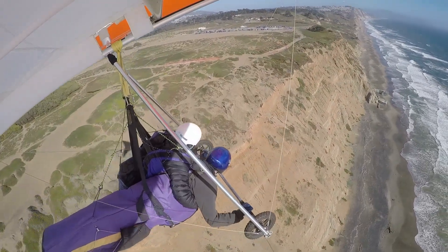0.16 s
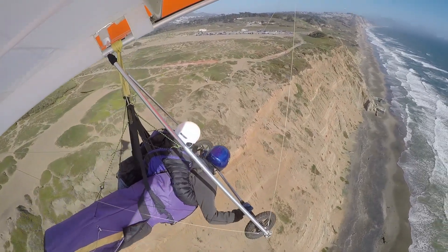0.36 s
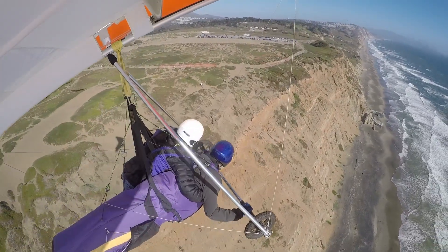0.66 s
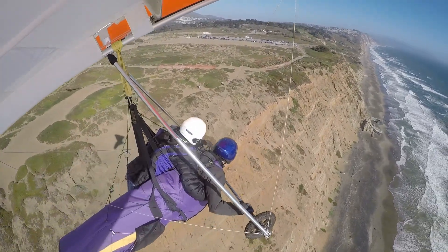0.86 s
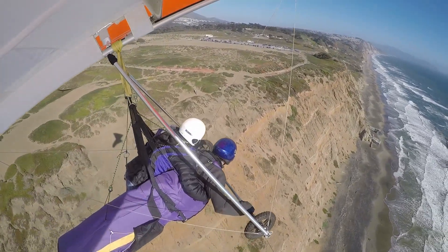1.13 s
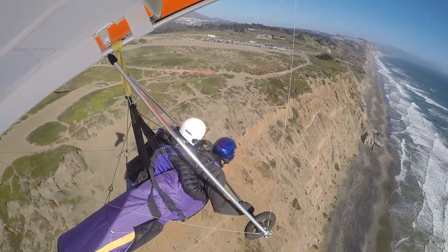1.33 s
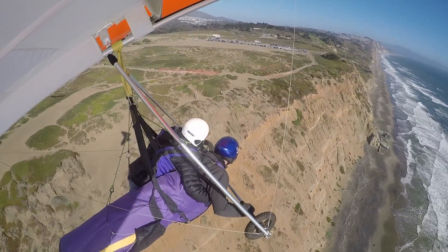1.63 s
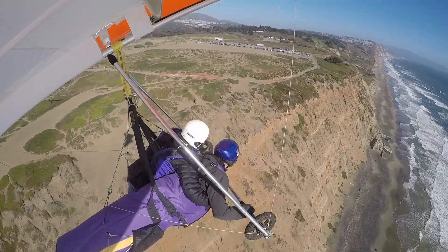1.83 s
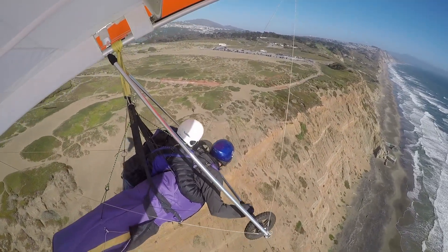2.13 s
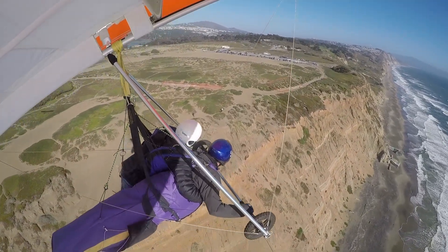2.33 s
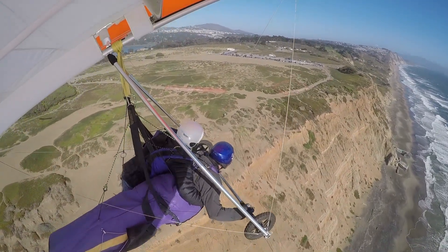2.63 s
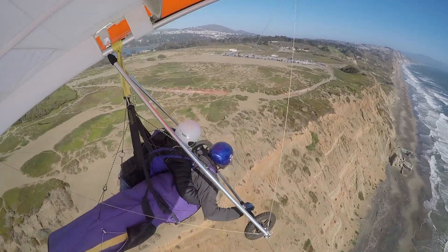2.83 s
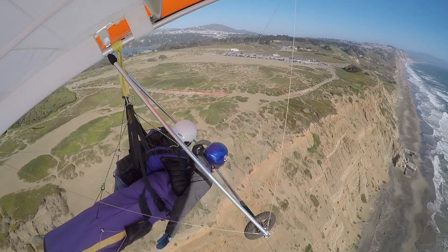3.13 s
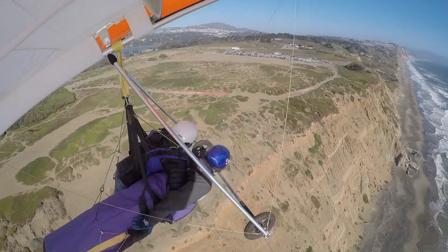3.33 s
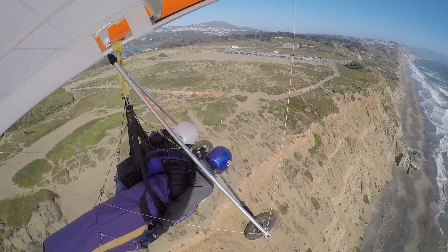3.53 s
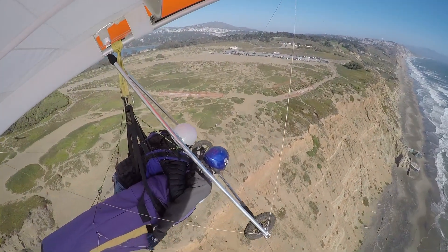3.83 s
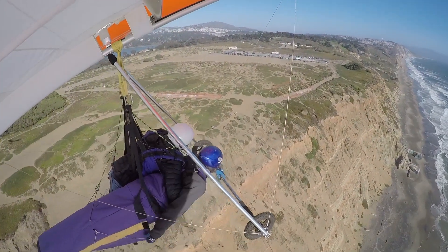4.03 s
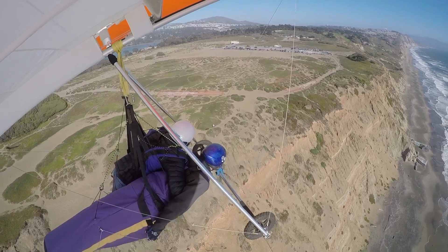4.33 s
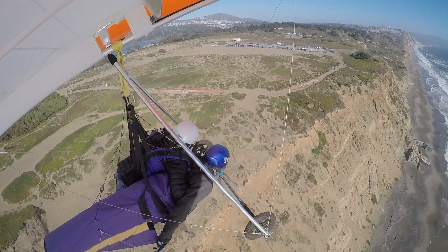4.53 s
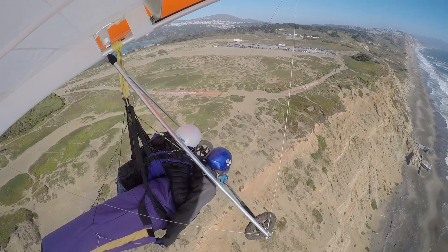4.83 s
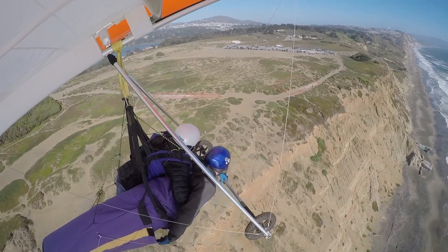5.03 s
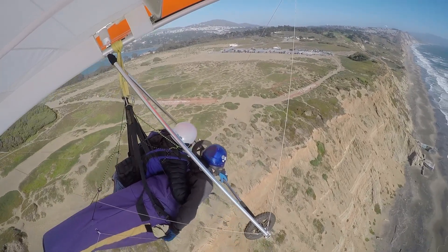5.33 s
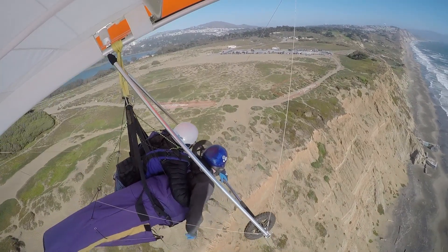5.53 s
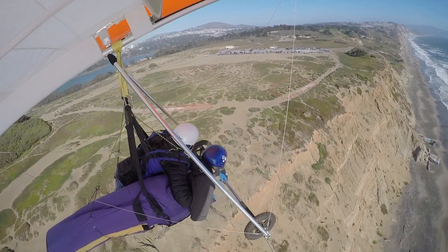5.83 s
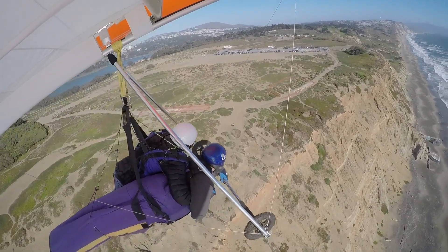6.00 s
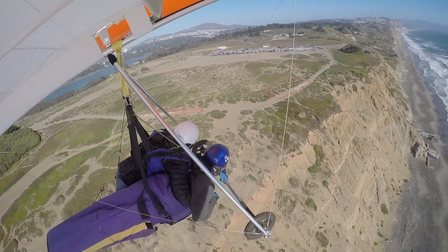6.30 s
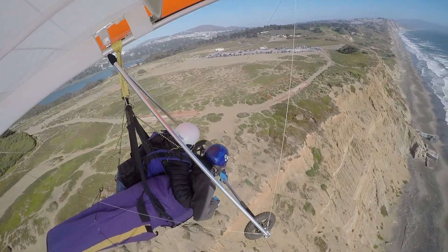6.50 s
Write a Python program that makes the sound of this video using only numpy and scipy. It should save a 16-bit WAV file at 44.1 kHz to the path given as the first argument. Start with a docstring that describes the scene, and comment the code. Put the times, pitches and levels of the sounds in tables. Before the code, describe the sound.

Heavy low wind buffeting shakes a camera on a glider wing, with airy hiss, loose fittings snapping and rattling, and a faint early whistle.

```python
"""Glider wing in flight

Turbulence shakes a camera mount at two low modes, drifting sine tones over broad low noise.
Loose fittings snap, rattle, tick and jolt: decaying modes, with noise bursts on snaps and rattles.
Air hisses over the housing's ports (shaped noise), tubes hum (narrow noise and drifting tones),
and a wire whistles early on (a fluttering tone). A faint microphone hiss lies beneath."""
import sys
import numpy as np
from scipy import signal
from scipy.fft import rfft, irfft, next_fast_len
from scipy.io import wavfile
from scipy.ndimage import uniform_filter1d, map_coordinates

SR = 44100
rng = np.random.default_rng(int(sys.argv[2]) if len(sys.argv) > 2 else 0)


def generate_wav(signal):
    """Clip the signal to [-1, 1] and save it as 16-bit WAV at the path in sys.argv[1]."""
    frames = np.transpose(np.atleast_2d(signal))
    scaled = np.clip(frames, -1, 1) * 32767
    pcm = np.round(scaled).astype(np.int16)
    wavfile.write(sys.argv[1], SR, pcm)


N = 293706


def amp(db):
    """Gain of a level in dB."""
    return 10 ** (np.asarray(db) / 20)


def unit(x):
    """x at rms 1."""
    return x / np.sqrt(np.mean(x ** 2) + 1e-20)


def along(points, hz):
    """Interpolate (frequency, value) points on a log frequency axis."""
    point_hz, values = np.transpose(points)
    return np.interp(np.log(hz + 1), np.log(point_hz + 1), values)


def curves(rows):
    """One value per sample for each column after the time."""
    times_s, *columns = np.transpose(rows)
    t = np.arange(N) / SR
    return [np.interp(t, times_s, column) for column in columns]


def wobble(rate_hz):
    """Smooth random curve, rate_hz knots a second."""
    knots = rng.standard_normal(int(N * rate_hz / SR) + 4)
    return map_coordinates(knots, [np.arange(N) * rate_hz / SR])


def filtered(x, response):
    """x with its spectrum multiplied by a response of frequency."""
    size = next_fast_len(N + SR // 2)
    spectrum = rfft(x, size) * response(np.fft.rfftfreq(size, 1 / SR))
    return irfft(spectrum, size)[..., :N]


def bell(hz, centre_hz, width_hz):
    """Resonance peak of height 1, one half at the edges of its width."""
    return 1 / (1 + (2 * (hz - centre_hz) / width_hz) ** 2)


def resonance(centre_hz, width_hz):
    """Noise ringing in one resonance, rms 1."""
    return unit(filtered(rng.standard_normal(N), lambda hz: bell(hz, centre_hz, width_hz)))


def swinging(hz, drift_hz, rate_hz, rough_db):
    """A sustained mode, rms 1: a sine whose pitch drifts and size wavers at random."""
    size = amp(rough_db * wobble(rate_hz))
    cycles = np.cumsum(hz + drift_hz * wobble(rate_hz)) / SR
    return unit(size * np.sin(2 * np.pi * cycles))


def struck(times_s, modes, levels_db, attack_s, spread_db=0.6):
    """Each blow rings decaying modes at its level, each mode slightly off in strength and pitch."""
    out, t = np.zeros(N + SR), np.arange(SR // 8) / SR
    hz, db, t60_s = np.transpose(modes)[..., None]
    chance = rng.standard_normal((len(times_s), 2, len(modes), 1))
    for s, level_db, (strength, pitch) in zip(times_s, levels_db, chance):
        start_db = db + np.reshape(level_db, (-1, 1)) + spread_db * strength
        decay = amp(start_db - 60 * t / t60_s)
        ring = decay * np.sin(2 * np.pi * hz * (1 + 0.01 * pitch) * t)
        out[round(s * SR):][:len(t)] += ring.sum(axis=0) * (1 - np.exp(-t / attack_s))
    return out[:N]


# airflow: (time [s], hiss level [dB], buffet level [dB])
AIRFLOW = [(0.0, -36, -17), (0.43, -32.5, -22.5), (0.82, -33, -19.5), (2.22, -37, -23.5),
           (2.52, -38.5, -25.5), (2.97, -41, -28), (4.71, -41, -30), (5.01, -42, -27.5), (5.64, -43, -28.5),
           (6.66, -38.5, -28.5)]
# slow mount mode: (time [s], level [dB])
SWAY_LEVEL = [(0.0,-26.5), (0.36,-14), (0.52,-32), (1.02,-19.5), (1.15,-29), (1.3,-18), (2.3,-26),
              (3.2,-18), (3.45,-25.5), (3.65,-20.5), (3.95,-32.5), (4.1,-15.5), (4.32,-48), (4.4,-21.5),
              (5.25,-27.5), (5.5,-31.5), (6.1,-19.5), (6.45,-23), (6.55,-34)]
# fast mount mode, kicked up by gusts: (time [s], level [dB])
DRUM_LEVEL = [(0.0, -27), (0.1, -17.5), (0.3, -18), (0.37, -32), (0.43, -26), (0.48, -10), (0.53, -27.5),
              (0.62, -15.5), (0.78, -13), (0.95, -20), (1.02, -28), (1.07, -16), (1.3, -23), (1.62, -25.5),
              (1.7, -20), (1.93, -17.5), (2.03, -29), (2.13, -15.5), (2.19, -24), (2.28, -19), (2.35, -32),
              (2.74, -17), (2.82, -30.5), (3.02, -19), (3.24, -31.5), (3.64, -25), (4.3, -33), (4.36, -17),
              (4.6, -33), (4.67, -17.5), (4.73, -34), (5.15, -23), (5.5, -29.5), (6.25, -25.5),
              (6.66, -30.5)]
# buffet spectrum: (frequency [Hz], relative density [dB per Hz])
BUFFET_SPECTRUM = [(14, -7), (25, -3.5), (60, -1.5), (105, 0), (135, -14.5), (180, -21.5), (300, -31.5),
                   (600, -68.5), (1500, -120)]
SWAY_HZ, DRUM_HZ = 26.94, 91.55  # at mean airflow


def mount():
    """Turbulence drives two mount modes, higher in pitch in faster air, over broad buffeting."""
    hiss_db, buffet_db = curves(AIRFLOW)
    faster_db = hiss_db - hiss_db.mean()
    sway = swinging(SWAY_HZ + 0.72 * faster_db, 2.45, rate_hz=7.9, rough_db=0.0)
    sway = unit(sway + amp(-3.5) * resonance(44.5, 25))
    drum = swinging(DRUM_HZ + 0.9 * faster_db, 3.5, rate_hz=18, rough_db=2.5)
    drum = unit(drum + amp(-9.5) * resonance(79.3, 35))
    buffet = unit(filtered(rng.standard_normal(N), lambda hz: amp(along(BUFFET_SPECTRUM, hz))))
    sway_db = curves(SWAY_LEVEL)[0] + 0.99 * wobble(5)
    drum_db = curves(DRUM_LEVEL)[0] + 1.0 * wobble(6.6)
    buffet_db = buffet_db + 1.7 * wobble(6)
    return amp(sway_db) * sway + amp(drum_db) * drum + amp(buffet_db) * buffet


# contact noise: (frequency [Hz], relative density [dB per Hz])
CRACK_SPECTRUM = [(700, -20.5), (1150, -1.5), (1450, -8.5), (1800, -1.5), (3000, -10), (4300, -40),
                  (6000, -27), (16000, -66.5)]


def cracks(times_s, levels_db, t60_s):
    """Contacts: decaying bursts of shaped noise."""
    starts = np.zeros(N)
    starts[np.round(times_s * SR).astype(int)] = amp(levels_db)
    envelope = signal.lfilter([1], [1, -amp(-60 / (t60_s * SR))], starts)
    return filtered(envelope * rng.standard_normal(N), lambda hz: amp(along(CRACK_SPECTRUM, hz)))


# snaps: (time [s], level [dB], treble re level [dB])
SNAP_EVENTS = [(0.164, -18, -30), (0.309, -17, -23), (0.5385, -15, -35), (0.7136, -23.5, -25),
               (0.9127, -23.5, -30), (1.337, -19.5, -38), (1.425, -18, -33), (2.332, -19.5, -29),
               (2.5652, -13, -26), (3.27, -22.5, -28), (3.56, -20, -51), (3.86, -20, -39),
               (4.1405, -21.5, -28), (4.4059, -17, -24.5), (4.6182, -12.5, -28), (4.867, -18, -31),
               (5.583, -21.5, -34), (6.0136, -27, -21), (6.0596, -22.5, -40), (6.523, -16.5, -32.5)]
# snap modes: (frequency [Hz], relative level [dB], t60 [s])
SNAP_MODES = [(1880, -17.5, 0.014), (2160, 3, 0.008), (2765, 1.5, 0.0068), (3930, -8, 0.0054),
              (2040, -15.5, 0.041)]
SNAP_CRACK_DB = 2  # noise re snap level
BOUNCE_S, BOUNCE_DB = 0.0032, -17  # nominal gap; first bounce re snap


def snaps():
    """A loose part snaps with a bright edge of tick modes and contact noise, then lands twice more."""
    s, db, treble_db = np.transpose(SNAP_EVENTS)
    attack_s = 0.0004
    out = struck(s, SNAP_MODES, db, attack_s)
    out += struck(s, TICK_MODES, db + treble_db, attack_s=0.0002)
    out += cracks(s, db + SNAP_CRACK_DB, t60_s=0.012)
    flights_s = np.cumsum(BOUNCE_S * rng.uniform(0.8, 1.3, (len(s), 2)), axis=1).T
    for k, late_s in enumerate(flights_s):
        out += struck(s + late_s, SNAP_MODES, db + BOUNCE_DB - 5 * k, 2 * attack_s, spread_db=3)
    return out


# loudest rattles: (time [s], level [dB], upper modes re level [dB])
RATTLE_EVENTS = [(0.115, -29, 0), (0.253, -36, 7), (0.403, -38, 11), (0.6606, -30.5, -1), (0.711, -29, -16),
                 (1.3214, -34.5, 2), (1.4473, -20.5, -11.5), (1.7132, -26.5, 1.5), (1.741, -29, -2),
                 (2.289, -25, -3.5), (2.401, -35, 1), (2.44, -26, -9.5), (2.589, -31, -4),
                 (2.7163, -24, -9), (2.805, -40, 4.5), (2.8855, -36, 4), (2.907, -33, -1.5),
                 (2.9867, -31, 2.5), (3.02, -18, -20.5), (3.227, -37.5, -2.5), (3.2766, -29, 0.5),
                 (3.456, -30, -8), (3.4953, -32.5, -4), (3.8352, -27, -2.5), (3.8729, -24.5, -3.5),
                 (3.912, -26, -8.5), (3.986, -27, -7.5), (4.055, -28, -10), (4.068, -20, -12),
                 (4.172, -29.5, 0), (4.203, -42, 12), (4.22, -41, 8), (4.2473, -32, -2), (4.272, -30.5, 2),
                 (4.465, -27, -15), (4.611, -24.5, -22), (4.781, -25.5, -10), (4.8255, -30.5, -3.5),
                 (4.923, -30.5, -14), (5.1767, -32, 0), (5.312, -39.5, 4), (5.7026, -24.5, -16),
                 (6.2913, -24, -4.5), (6.5335, -29, -2.5)]
# rattle modes, lowest first: (frequency [Hz], relative level [dB], t60 [s])
RATTLE_MODES = [(1143, 1, 0.018), (1656, 1, 0.074), (2000, -7.5, 0.017), (2780, 0, 0.015),
                (3160, -7.5, 0.025)]
FAINT_RATTLES = 12  # at random times
FAINT_DB, FAINT_UPPER_DB, FAINT_SPREAD_DB = -39, -1.5, 3  # spread: +/-
UPPER_SPREAD_DB = 1.8  # upper modes differ from blow to blow
RATTLE_CRACK_DB = 12.5  # noise re upper modes


def rattles():
    """Dull parts touch twice: a low mode, slightly later upper modes, and contact noise."""
    when, size, colour = rng.uniform(-1, 1, (FAINT_RATTLES, 3)).T
    faint_s = (when + 1) / 2 * (N - SR // 20) / SR
    faint_db = FAINT_DB + FAINT_SPREAD_DB * size
    faint_upper_db = FAINT_UPPER_DB + FAINT_SPREAD_DB * colour
    faint = [faint_s, faint_db, faint_upper_db]
    s, db, upper_db = np.hstack([np.transpose(RATTLE_EVENTS), faint])
    again_s = s + BOUNCE_S * (1 + rng.random(len(s)))
    s, db, upper_db = np.hstack([[s, db, upper_db], [again_s, db - 8.5, upper_db]])
    low = struck(s, RATTLE_MODES[:1], db, attack_s=0.0013)
    upper = struck(s + 0.00103, RATTLE_MODES[1:], db + upper_db, attack_s=0.0031,
                   spread_db=UPPER_SPREAD_DB)
    return low + upper + cracks(s, db + upper_db + RATTLE_CRACK_DB, t60_s=0.048)


# ticks: (time [s], level [dB])
TICK_EVENTS = [(0.412, -39.5), (1.4477, -37), (2.441, -38.5), (2.715, -47), (3.971, -49), (3.987, -38.5),
               (4.195, -48.5), (4.498, -48), (5.1761, -48.5), (5.701, -46)]
# tick modes, also the snaps' edge: (frequency [Hz], relative level [dB], t60 [s])
TICK_MODES = [(4100, 9, 0.0085), (5760, 3.5, 0.0097), (7140, 6, 0.0065), (8900, -3.5, 0.0072),
              (12000, -6, .005), (14000, -10.5, 0.005)]


def ticks():
    """Thin ticks: short high modes with a very fast attack."""
    s, db = np.transpose(TICK_EVENTS)
    return struck(s, TICK_MODES, db, attack_s=0.00012, spread_db=3)


# frame jolts: (time [s], low mode [Hz], low mode level [dB], upper modes level [dB])
JOLT_EVENTS = [(3.973, 90, -11, -33), (4.039, 84, -11, -36), (4.056, 106.5, -5, -15),
               (4.0906, 76, -0.5, -25), (4.257, 83, -5.5, -21)]
# jolt upper modes: (frequency [Hz], relative level [dB], t60 [s])
JOLT_MODES = [(141, 0, 0.074), (185, 7, 0.038), (254, -7, 0.098), (401, -13, 0.08)]
JOLT_LOW_T60_S = 0.12


def jolts():
    """Jolts through the frame: one low mode, with upper modes rising more slowly."""
    out = np.zeros(N)
    for s, hz, low_db, upper_db in JOLT_EVENTS:
        out += struck([s], [(hz, low_db, JOLT_LOW_T60_S)], [0], attack_s=0.003)
        out += struck([s], JOLT_MODES, [upper_db], attack_s=0.014)
    return out


def patchy(patchy_db):
    """White noise with time-frequency patches of random gain."""
    z = signal.stft(rng.standard_normal(N), nperseg=512)[2]
    field = uniform_filter1d(rng.standard_normal(z.shape), size=6, axis=0)
    field = uniform_filter1d(field, size=10, axis=1)
    return signal.istft(z * amp(patchy_db * unit(field)), nperseg=512)[1][:N]


# hiss spectrum: (frequency [Hz], relative density [dB per Hz])
HISS_SPECTRUM = [(150, 0), (320, -5.5), (700, -0.5), (900, -6), (1500, -9.5), (1750, -2.5), (3000, -9),
                 (4400, -20.5), (6200, -26), (8300, -37.5), (11500, -43.5), (14000, -46), (15500, -70.5)]
# housing resonances: (frequency [Hz], width [Hz], lift [dB])
PORT_PEAKS = [(1140, 290, 5), (2406, 555, 9.5), (3733, 1240, 11.5), (5485, 930, 9.5), (6660, 220, 8.5),
              (7350, 580, 12.5), (9950, 1600, 11.5)]


def hiss():
    """Air over the ports: noise lifted at housing resonances, louder and brighter in faster air."""
    hiss_db = curves(AIRFLOW)[0]

    def colour(hz):
        lift_db = sum(db * bell(hz, centre, width) for centre, width, db in PORT_PEAKS)
        return amp(along(HISS_SPECTRUM, hz) + lift_db)

    air = unit(filtered(patchy(1.0), colour))
    # fades in over the octave above 3500 Hz
    treble = filtered(air, lambda hz: np.clip(np.log2((hz + 1) / 3500), 0, 1))
    brighter = amp(0.89 * (hiss_db - hiss_db.mean())) - 1
    level_db = hiss_db + 0.22 * wobble(14) + 0.9 * wobble(60)
    return amp(level_db) * (air + brighter * treble)


# whistle: (time [s], level before flutter and fade [dB])
WHISTLE_LEVEL = [(0.05, -59), (.17, -39.5), (.26, -50), (.3, -34), (.42, -52), (.5, -38), (.62, -57),
                 (.7, -38), (.76, -46), (.82, -38), (.93, -52), (.98, -43), (1.1, -45.5), (1.49, -38.5),
                 (1.55, -52), (1.65, -39), (1.75, -54), (1.95, -49), (2.3, -56)]
# whistle pitch: (time [s], frequency [Hz])
WHISTLE_PITCH = [(0.3, 786.4), (1.65, 769), (1.85, 706)]


def wire():
    """Vortices off a wire whistle, fluttering, and sink in pitch as the speed drops."""
    (db,), (hz,) = curves(WHISTLE_LEVEL), curves(WHISTLE_PITCH)
    fade_s = 0.13  # after the last level
    fade = np.clip((WHISTLE_LEVEL[-1][0] + fade_s - np.arange(N) / SR) / fade_s, 0, 1)
    flutter = np.clip(0.85 + 0.3 * wobble(36), 0.3, 1.15)
    return amp(db) * fade * flutter * swinging(hz, 7, rate_hz=32, rough_db=1)


# tube resonances: (frequency [Hz], width [Hz], level at mean airflow [dB], gain per dB of hiss [dB])
TUBE_HUMS = [(407.6, 103, -52.5, 0), (568, 49, -53, 0.9), (776, 18, -60, -0.3)]
# brief hums of one tube: (time [s], hold [s], pitch [Hz], level of the tone [dB])
TUBE_PUFFS = [(1.803, 0.021, 428.3, -43), (2.02, 0.045, 428, -43), (4.056, 0.11, 410, -46),
              (4.231, 0.067, 423, -42), (4.855, 0.023, 444.4, -39.5), (4.928, 0.021, 431, -43),
              (5.194, 0.068, 433, -43.5), (5.27, 0.096, 429, -48)]
PUFF_RISE_S, PUFF_FALL_S, PUFF_UPPER_DB = 0.011, 0.015, -3


def tubes():
    """Wind shakes tube resonances into a hum; one tube swells in short puffs."""
    hiss_db, t = curves(AIRFLOW)[0], np.arange(N) / SR
    starts_s, holds_s, pitches_hz, levels_db = np.transpose(TUBE_PUFFS)
    envelope = np.zeros(N)
    for s, hold_s, db in zip(starts_s, holds_s, levels_db):
        corners_s = [-PUFF_RISE_S, 0, hold_s, hold_s + PUFF_FALL_S]
        envelope += amp(db) * np.interp(t - s, corners_s, [0, 1, 1, 0])
    current = np.clip(np.searchsorted(starts_s - PUFF_RISE_S, t) - 1, 0, None)
    puff = swinging(pitches_hz[current], 20, rate_hz=40, rough_db=4.0)
    puff += 0.36 * resonance(375, 110) + amp(PUFF_UPPER_DB) * resonance(588, 90)
    out = envelope * puff
    for hz, width_hz, db, grows in TUBE_HUMS:
        level_db = db + grows * (hiss_db - hiss_db.mean()) + 1.5 * wobble(6.2)
        tone = swinging(hz, 12.03, rate_hz=30, rough_db=3.0)
        out += amp(level_db) * unit(resonance(hz, width_hz) + 0.5 * tone)
    return out


def scene():
    """All sources summed to one channel."""
    fittings = snaps() + rattles() + ticks() + jolts()
    return (mount() + fittings + hiss() + wire() + tubes())[None]


# microphone hiss: (frequency [Hz], relative density [dB per Hz])
MIC_SPECTRUM = [(3000, -25), (6000, -2), (10000, -15), (15000, -20)]
MIC_HISS_DB, BAND_LIMIT_HZ = -67.0, 15400


def record(dry):
    """The microphone adds a faint high hiss; the camera keeps nothing above its band limit."""
    def colour(hz):
        return amp(along(MIC_SPECTRUM, hz) - 90 * (hz < 3000))

    own = amp(MIC_HISS_DB) * unit(filtered(rng.standard_normal(N), colour))
    return filtered(dry + own, lambda hz: hz < BAND_LIMIT_HZ)


dry = scene()
out = record(dry)
generate_wav(out)
```